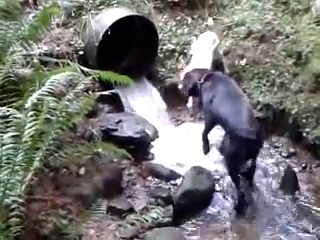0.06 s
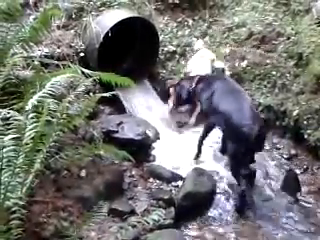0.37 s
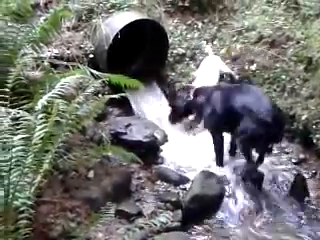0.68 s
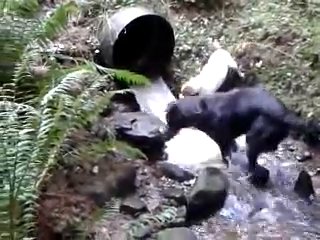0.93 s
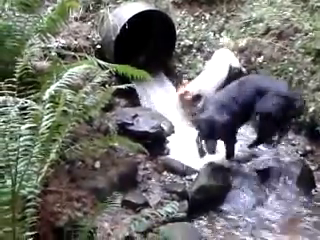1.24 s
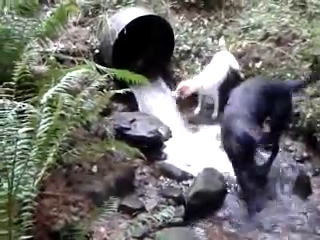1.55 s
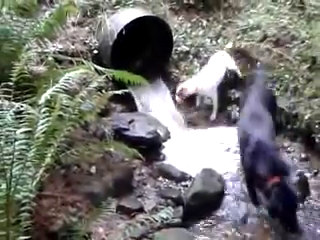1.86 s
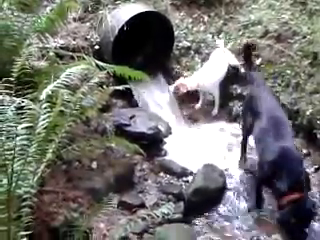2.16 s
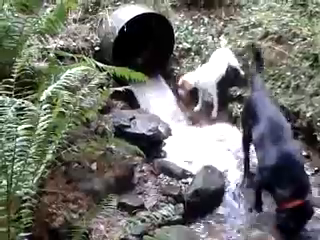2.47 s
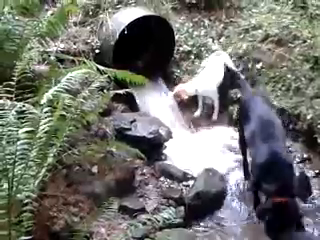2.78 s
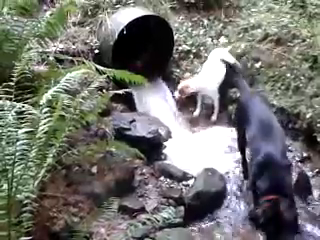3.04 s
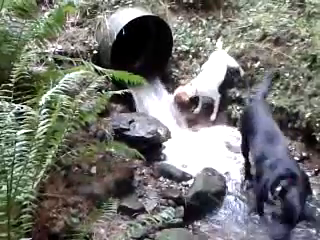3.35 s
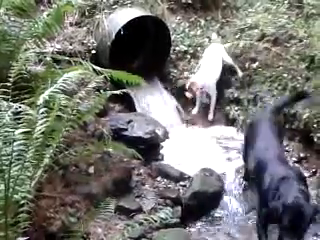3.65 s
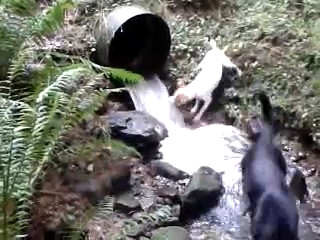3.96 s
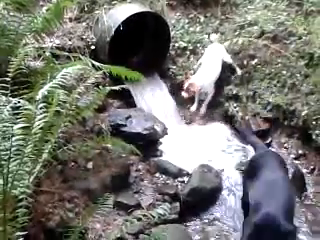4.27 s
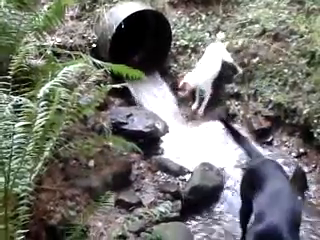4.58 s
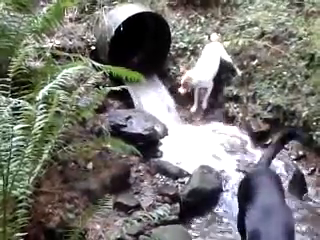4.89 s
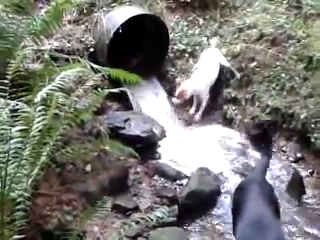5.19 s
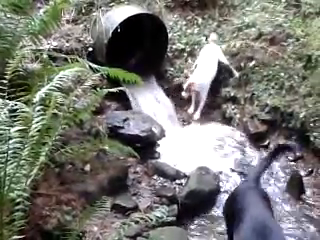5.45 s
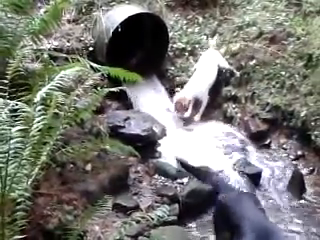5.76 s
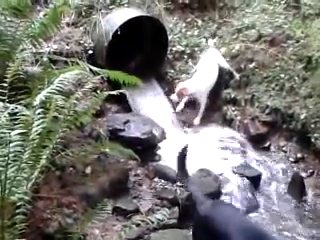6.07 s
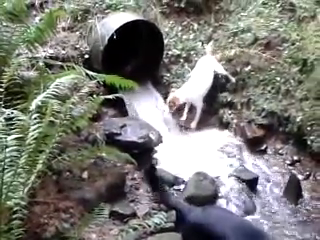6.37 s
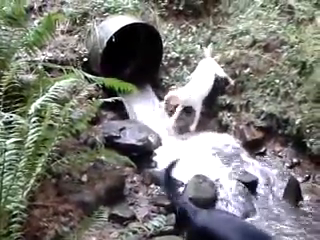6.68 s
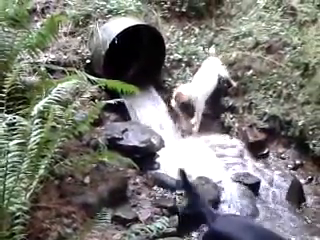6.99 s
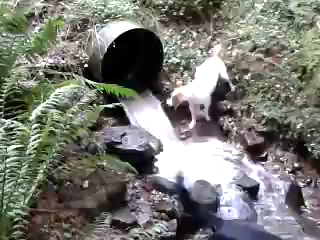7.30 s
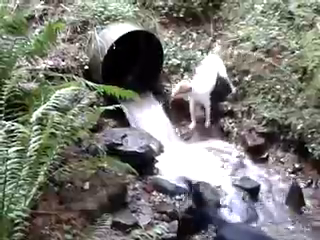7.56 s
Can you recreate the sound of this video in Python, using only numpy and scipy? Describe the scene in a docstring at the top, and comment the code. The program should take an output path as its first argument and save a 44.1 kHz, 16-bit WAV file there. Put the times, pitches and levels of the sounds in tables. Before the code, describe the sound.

Water gushes steadily from a large drain pipe onto rocks, hissing and gurgling, while a dog splashes through the shallows.

```python
"""From the start, a few metres off, water gushes from a large drain pipe onto rocks and runs off as a
stream: the jet hisses, bubbles gurgle in the pool under it and spray patters on the stones.
Within the first second a dog is wading through the shallows, its paws splashing and sloshing.
At about 3.4 s one paw plunges in, and the air pockets behind it collapse in a deep gulp.
Lighter steps, drops and plops carry on over the steady jet to the end."""
import sys
import numpy as np
from scipy import signal
from scipy.fft import rfft, irfft, next_fast_len
from scipy.io import wavfile
from scipy.ndimage import uniform_filter1d

SR = 44100
rng = np.random.default_rng(int(sys.argv[2]) if len(sys.argv) > 2 else 0)


def write(x):
    x = np.atleast_2d(x).T
    wavfile.write(sys.argv[1], SR, np.round(np.clip(x, -1, 1) * 32767).astype(np.int16))


N = 340893
T = np.arange(N) / SR
EDGE_HZ = 7300  # top end of the whole scene

# Tone of the gushing jet: frequency_hz, level_db
JET_SPECTRUM = [(15, -50.5), (25, -11), (96, 0), (440, -2), (531, -5), (673, -2.5), (814, -3), (1110, -2),
                (1470, -8), (2150, -9.5), (2860, -8.5), (4080, -5.5), (6400, -2.5), (7200, -6.5),
                (9360, -18.5), (15800, -120)]
# Hollow colour of the pipe mouth and the rocks round the pool: centre_hz, width_hz, gain_db
HOLLOW_BANDS = [(75, 29, -2.5), (99, 34, 1.5), (447, 41, -2), (543, 136, 3.8), (689, 100, 3.5),
                (780, 170, -2), (1100, 290, 2), (1500, 100, -0.5), (1686, 140, 3), (2150, 240, 3.5),
                (2600, 160, 1.5), (2880, 190, -3), (3345, 230, -3), (4450, 220, -1.5), (4580, 300, 1.6),
                (6250, 250, 1.1), (6780, 230, 2.5)]
# Slow swell of the jet about its usual strength: time_s, churn_db, spray_db
JET_SWELL = [(0, 0.5, 0.9), (.7, -1, 0), (1.149, -0.5, 0.5), (1.279, -0.5, -0.9), (1.9, -0.9, 1.5),
             (2.099, 0.5, 0.7), (2.75, -0.4, .5), (3.031, -0.9, 0), (3.48, -2, 1.8), (3.798, 0.5, 0),
             (4.0, -0.5, 0), (5.05, -1, 0.7), (5.948, 0, -1.3), (6.152, 0.5, 0), (6.747, -0.5, -0.1),
             (7.73, -0.5, -1)]
# Paws and gobs of water hitting the surface: start_s, relative_db, centre_hz, time_scale_s, ring_cycles
SPLASH_HITS = [(.2555, -37, 5000, .003, 2), (.287, -44, 4200, 0.004, 3), (0.823, -31.5, 1800, 0.0011, 1.2),
               (.826, -43, 2900, .002, 1.5), (.8355, -44, 4900, .0007, 1.2), (0.871, -39, 4300, .0018, 3.9),
               (.883, -49, 2580, 0.0018, 3.9), (.946, -42, 1500, .003, 2), (1.103, -36.5, 1790, 0.0043, 2),
               (1.112, -45, 4300, 0.0045, 3.9), (1.131, -40, 2300, .002, 3.9),
               (1.1597, -35.5, 2790, 0.0035, 3), (2.492, -39, 1900, 0.0073, 2),
               (3.147, -37, 1500, 0.0054, 1.5), (3.16, -30, 2700, 0.00064, 1.5),
               (3.388, -38.5, 4190, 0.012, 3.9), (3.413, -35.5, 3500, .0015, 3),
               (3.428, -33.5, 3300, 0.0029, 3.9), (3.573, -32, 4300, 0.0034, 2),
               (3.683, -38.5, 3000, 0.0032, 1.8), (4.302, -38, 6340, 0.014, 2),
               (4.318, -45, 3600, .0018, 3.9), (4.352, -39.5, 3200, 0.0059, 3),
               (4.662, -37, 3440, .0015, 2), (5.005, -43, 5100, 0.0027, 3.9),
               (5.027, -41, 2300, .0015, 3.9), (5.122, -39, 4200, 0.0071, 3.9),
               (5.137, -38, 1800, 0.0095, 2), (5.154, -38, 5200, .003, 3), (5.164, -37, 5600, .003, 3),
               (5.200, -41, 1800, 0.0018, 2), (5.576, -33.5, 5400, 0.0029, 3.5),
               (5.868, -39, 5200, 0.0018, 3.9), (6.149, -45, 1420, 0.0048, 3.5),
               (6.152, -39.5, 4600, .006, 3.9), (6.229, -41, 2500, .002, 2), (6.662, -41, 3530, 0.015, 2.3),
               (6.720, -35, 4500, .0012, 3.9), (6.823, -39, 3400, .0025, 3.9), (7.137, -42, 1950, .003, 2)]
# Big drops smacking on the stones: start_s, relative_db, pitch_hz
STONE_DROPS = [(0.256, -24, 4950), (.289, -27, 3800), (.691, -25, 5170), (0.8742, -20, 6700),
               (.875, -26, 4130), (3.3892, -19.5, 6750), (3.5742, -20, 6350), (3.5742, -31, 3720),
               (3.9414, -24, 6460), (4.305, -22, 6140), (4.6094, -19, 6760), (5.008, -19.5, 5970),
               (5.1965, -23, 6840), (5.3965, -23.5, 4450), (6.7212, -25, 6120)]
# Large bubbles plopping out of the gurgle: start_s, relative_db, pitch_hz
POOL_PLOPS = [(.5887, -21.5, 2070), (1.154, -26, 725), (1.1575, -19, 1050), (1.3842, -21, 1130),
              (2.0437, -20, 1085), (2.316, -23, 1000), (2.666, -21, 1080), (2.818, -24, 900),
              (3.159, -31.5, 318), (3.166, -23.5, 646), (3.372, -26, 303), (3.3891, -24, 850),
              (3.416, -22, 1470), (3.4372, -19.5, 1640), (3.446, -22, 1510), (3.793, -21, 980),
              (3.8735, -21.5, 1760), (4.775, -22, 1140), (5.122, -21, 970), (5.151, -24, 1190),
              (5.153, -24, 710), (5.141, -21, 2080), (5.483, -24, 810), (5.866, -22.5, 980),
              (5.897, -29, 680), (5.922, -29, 600), (6.133, -30, 1020), (6.249, -29, 566),
              (6.146, -29, 594), (6.156, -25, 730), (6.155, -25, 305), (6.1945, -22.5, 700),
              (6.2, -22, 597), (6.2295, -20, 2600), (6.665, -21, 3450), (6.6774, -21, 3650),
              (6.774, -24, 1120), (6.8071, -25, 660), (6.808, -30, 322), (6.9179, -22, 536),
              (7.008, -27, 517), (7.032, -31, 464), (7.1349, -20, 1690), (7.138, -28, 623)]
# Water stirred by the dog's legs: start_s, length_s, level_db, rush_over_rumble_db
LEG_STROKES = [(0.702, 0.093, -43, 3), (0.888, 0.13, -41.5, -1), (0.975, 0.32, -43.5, -3),
               (2.006, 0.071, -47, -3), (3.127, 0.057, -42, 2), (3.368, 0.11, -36, 4),
               (3.628, 0.094, -42, -2), (3.88, 0.04, -39, -9), (5.12, .06, -52, 0), (6.122, 0.1, -48, 9),
               (6.304, 0.67, -50, -18), (7.663, 0.16, -41.5, -1)]
# Tone of the rumble in a slosh: frequency_hz, level_db
SLOSH_SPECTRUM = [(25, -13.5), (60, -1), (160, 4), (330, -1), (700, -6), (1200, -23.5), (3000, -48.5)]
# Air pockets collapsing behind the paws, one for a step and a quick run for the plunge:
# start_s, push_db, ring_db, pitch_hz
AIR_POCKETS = [(0.94, -40, -25, 170), (1.137, -41, -32, 171), (2.04, -41, -31, 179),
               (3.3998, -28, -25, 330), (3.4035, -47, -19.5, 750), (3.4125, -38, -26, 288),
               (3.414, -23, -24, 340), (3.418, -45, -25, 600), (3.4287, -23, -15.5, 592),
               (3.4335, -56, -19, 720), (3.4372, -40, -25, 1020), (3.448, -31, -19.5, 502)]


def amp(db):
    """Decibels to gain."""
    return 10 ** (np.asarray(db) / 20)


def unit(x):
    """Scales to an rms of 1."""
    return x / np.sqrt(np.mean(x ** 2) + 1e-20)


def curve_db(spectrum, hz):
    """Reads a spectrum on a log-frequency axis."""
    f, db = np.transpose(spectrum)
    return np.interp(np.log(hz + 1), np.log(f + 1), db)


def add(mix, start_s, sound):
    """Mixes a sound in at its cue."""
    part = mix[max(round(start_s * SR), 0):][:len(sound)]
    part += sound[:len(part)]


def colour(x, db_at):
    """Equalises x with a dB curve given as a function of frequency."""
    size = next_fast_len(len(x))
    gain = amp(db_at(np.fft.rfftfreq(size, 1 / SR)))
    return irfft(rfft(x, size) * gain, size)[:len(x)]


def noise(db_at, samples=N):
    """Coloured noise of rms 1."""
    return unit(colour(rng.standard_normal(samples), db_at))


def wander(slow_hz, fast_hz):
    """Random drift of rms 1 with about equal power in every octave between two rates."""
    return noise(lambda f: 10 * np.log10(f / (f * f + slow_hz ** 2) / (1 + (f / fast_hz) ** 4) + 1e-20))


def gush(churn_db, spray_db, level_db=-36, patchy_db=1.5, flicker_db=0.3, split_hz=1600):
    """Countless tiny bubbles merge into a roar below and a hiss above, patchy in time and pitch."""
    frame, hop = 256, 64
    hz, _, grains = signal.stft(rng.standard_normal(N), SR, nperseg=frame, noverlap=frame - hop)
    patches = uniform_filter1d(rng.standard_normal(grains.shape), size=7, axis=0)
    patches = unit(uniform_filter1d(patches, size=9, axis=1))
    at = np.minimum(np.arange(grains.shape[1]) * hop, N - 1)
    hiss_share = 1 / (1 + (split_hz / (hz[:, None] + 1)) ** 2)
    swell_db = (1 - hiss_share) * churn_db[at] + hiss_share * spray_db[at]
    gain = amp(patchy_db * patches + swell_db + flicker_db * wander(12, 110)[at])
    jet = signal.istft(grains * gain, nperseg=frame, noverlap=frame - hop)[1][:N]
    return amp(level_db) * unit(colour(jet, lambda f: curve_db(JET_SPECTRUM, f)))


def bubble(hz, decay_s, rise):
    """One bubble: a brief ring that rises in pitch as it nears the surface."""
    age = np.arange(int(5 * decay_s * SR) + 2) / (decay_s * SR)  # in decay times
    envelope = np.exp(-age) * (1 - np.exp(-6 * age))
    return envelope * np.sin(2 * np.pi * hz * decay_s * (age + rise * age ** 2 / 2))


def swarm(swell_db, low_hz, high_hz, per_s, cycles, spread_db, rise, sizes):
    """Bubbles of many sizes, born at random; a few are much louder than the rest."""
    out = np.zeros(N)
    for hz in np.geomspace(low_hz, high_hz, sizes):
        chance, strength, sign = rng.random((3, N), dtype=np.float32)
        born = np.flatnonzero(chance < per_s / sizes / SR)
        accent_db = spread_db * np.minimum(-np.log(strength[born] + 1e-9), 3.5)
        kicks = np.zeros(N)
        kicks[born] = np.sign(sign[born] - .5) * amp(accent_db)
        out += signal.oaconvolve(kicks, bubble(hz, cycles / hz, rise) * np.sqrt(hz))[:N]
    return unit(out * amp(swell_db))


def hollow_db(f):
    """The pipe mouth and the rocks lend the water bell-shaped peaks and dips."""
    return sum(db * np.exp(-(2 * (f - hz) / width) ** 2) for hz, width, db in HOLLOW_BANDS)


def splashes(slap_db=2, shower_gain=0.041, shower_s=0.018, knock_db=12, knock_delay_s=0.0015):
    """A slap on the surface, the knock of the cavity it opens, then a short shower of droplets."""
    out, t = np.zeros(N), T[:4096]
    for start_s, db, hz, scale_s, cycles in SPLASH_HITS:
        octaves = 1.027 * (2500 / hz) ** 0.97  # finer spray has a narrower band
        fizz = noise(lambda f: -10 * np.log10(
            1 + (np.log2((f + 1) / hz) / octaves) ** 6 + (f / EDGE_HZ) ** 20), len(t))
        attack = 1 - np.exp(-t / (0.32 * scale_s))  # long splashes start softly
        envelope = attack * (np.exp(-t / (3.5 * scale_s)) + shower_gain * np.exp(-t / shower_s))
        add(out, start_s, amp(db + slap_db) * fizz * envelope / envelope.max())
        add(out, start_s + knock_delay_s, amp(db + knock_db) * bubble(hz, cycles / hz, rise=0.0087))
    return out


def drips(events, gain_db, cycles, rise, shed_db, shed_s, shed_octaves, shed_count):
    """Close drops or bubbles: low ones ring longer, and each sheds fainter ones at scattered pitches."""
    out = np.zeros(N)
    for start_s, db, hz in events:
        level = amp(db + gain_db)
        add(out, start_s, level * bubble(hz, cycles / hz, rise))
        for delay, detune in rng.random((shed_count, 2)):
            shed_hz = hz * 2 ** (shed_octaves * (2 * detune - 1))
            fragment = bubble(shed_hz, cycles / shed_hz, rise)
            add(out, start_s + delay * shed_s, level * amp(shed_db) * fragment)
    return out


def sloshes(rush_hz=2000, rush_octaves=2.4):
    """Legs push water aside: a soft, low surge, topped by the rush of water falling back."""
    push, shower = np.zeros((2, N))
    for start_s, length_s, db, rush_db in LEG_STROKES:
        swell = amp(db) * np.sqrt(np.hanning(int(length_s * SR)))
        add(push, start_s, swell)
        add(shower, start_s, amp(rush_db) * swell)
    rumble = noise(lambda f: curve_db(SLOSH_SPECTRUM, f))
    rush = noise(lambda f: -10 * np.log10(1 + (np.log2((f + 1) / rush_hz) / rush_octaves) ** 6))
    return push * rumble + shower * rush


def gulps(push_s=0.00035, heave_hz=72, heave_s=0.014, heave_db=-7, ring_s=0.0058):
    """A collapsing pocket pulls the pressure down, heaves the water and rings the air that is left."""
    out, t = np.zeros(N), T[:4096]
    pulse = t / push_s * np.exp(1 - t / push_s)
    heave = amp(heave_db) * np.exp(-t / heave_s) * np.sin(2 * np.pi * heave_hz * t)
    for start_s, push_db, ring_db, hz in AIR_POCKETS:
        add(out, start_s, -amp(push_db) * (pulse + heave))
        add(out, start_s, -amp(ring_db) * bubble(hz, ring_s, rise=0.016))
    return out


def scene():
    """The lumpy jet drives a bed of hiss, gurgle and spray together; the dog wades in front."""
    time_s, churn_swell_db, spray_swell_db = np.transpose(JET_SWELL)
    surge = wander(3.1, 35)
    pool_heave = wander(2, 9.8)
    churn_db = np.interp(T, time_s, churn_swell_db) + 0.086 * surge + 0.3 * pool_heave
    spray_db = np.interp(T, time_s, spray_swell_db) + 0.96 * surge
    gurgle = swarm(churn_db, 476.7, 1236, per_s=380, cycles=3.66, spread_db=2, rise=0.057, sizes=16)
    plinks = swarm(churn_db, 1325, 3520, per_s=550, cycles=5, spread_db=4.5, rise=0.034, sizes=14)
    spray = swarm(spray_db, 3890, 6670, per_s=1100, cycles=8, spread_db=4, rise=0.014, sizes=14)
    bed = gush(churn_db, spray_db) + amp(-47.5) * gurgle + amp(-51.5) * plinks + amp(-45) * spray
    drops = drips(STONE_DROPS, gain_db=5.5, cycles=4.3, rise=0.02,
                  shed_db=-11, shed_s=0.008, shed_octaves=0.3, shed_count=4)
    plops = drips(POOL_PLOPS, gain_db=-4.5, cycles=4.7, rise=0.011,
                  shed_db=-17.5, shed_s=0.0084, shed_octaves=0.45, shed_count=3)
    wading = sloshes() + splashes() + gulps()
    return (colour(bed, hollow_db) + drops + plops + wading)[None]


def record(dry):
    """A steep high cut takes the air off the top of the mix."""
    high_cut = signal.firwin(601, EDGE_HZ, window=("kaiser", 9), fs=SR)
    return signal.oaconvolve(dry, high_cut[None], "same")


dry = scene()
out = record(dry)
write(out)
```